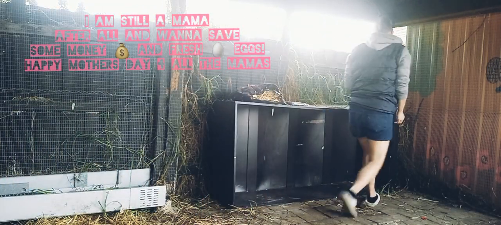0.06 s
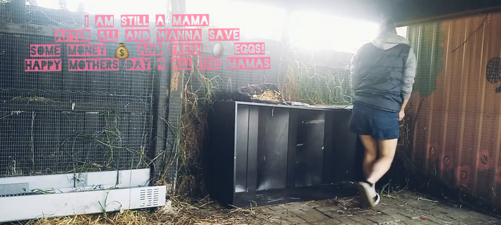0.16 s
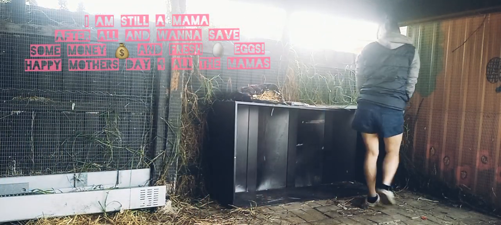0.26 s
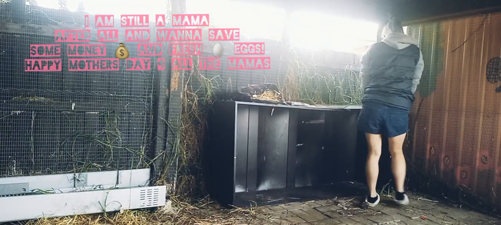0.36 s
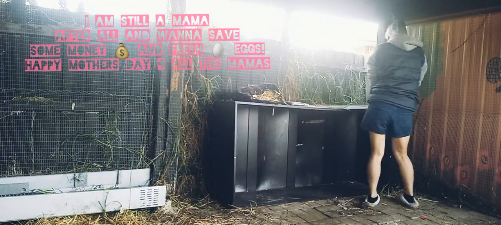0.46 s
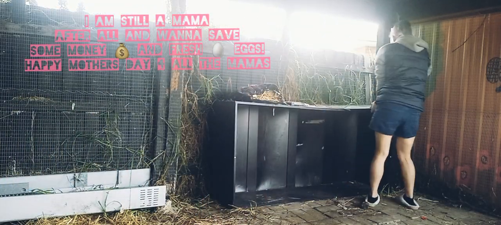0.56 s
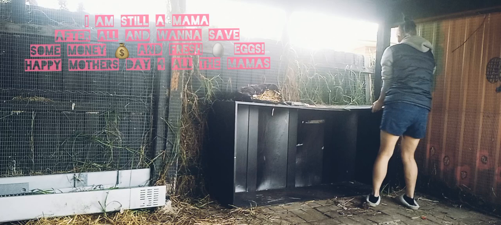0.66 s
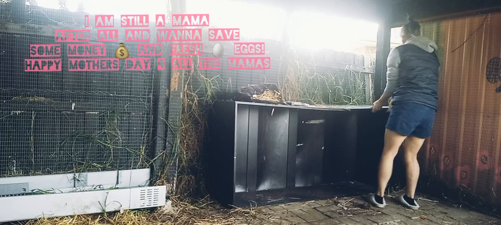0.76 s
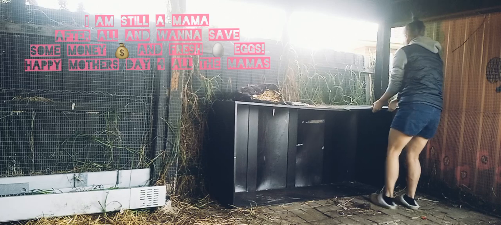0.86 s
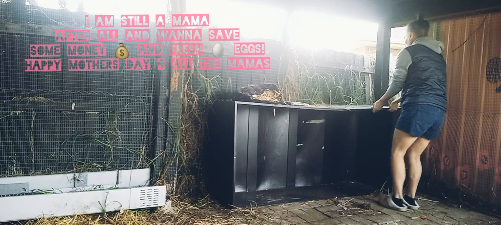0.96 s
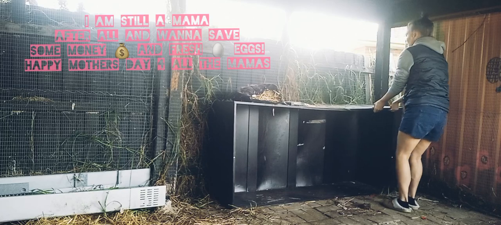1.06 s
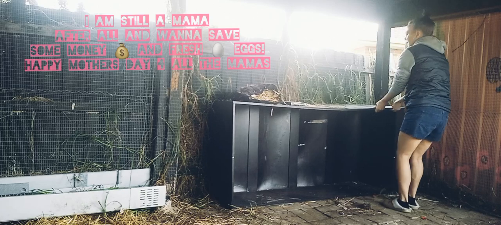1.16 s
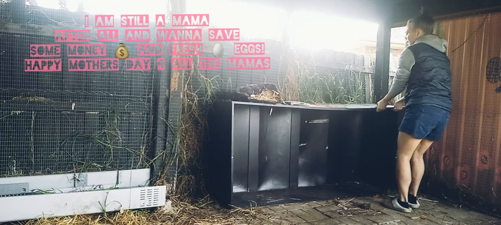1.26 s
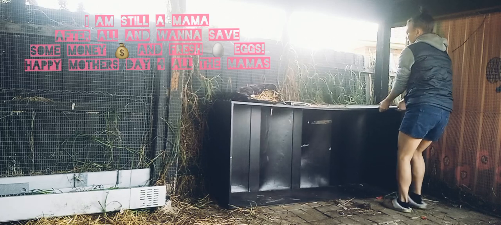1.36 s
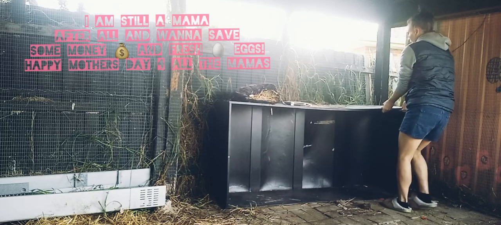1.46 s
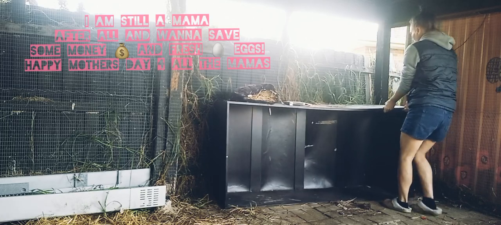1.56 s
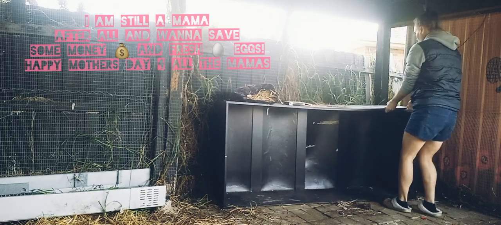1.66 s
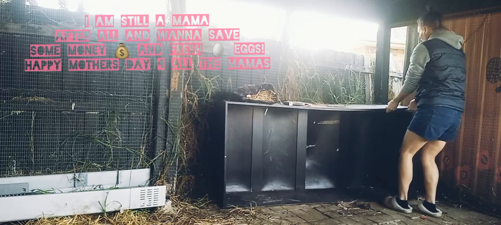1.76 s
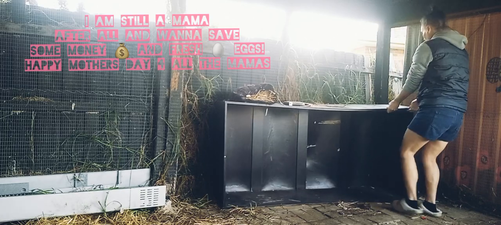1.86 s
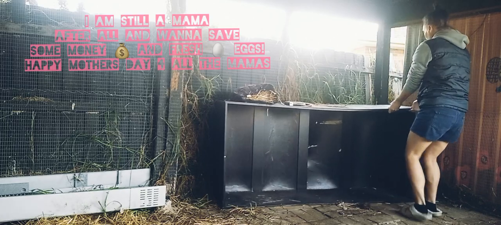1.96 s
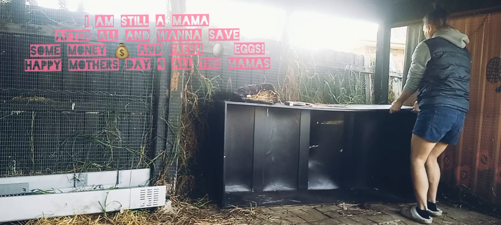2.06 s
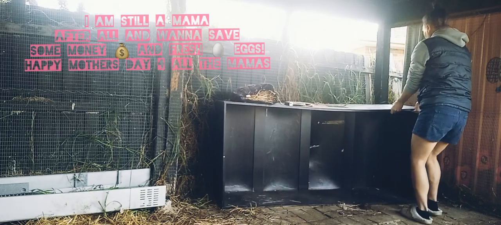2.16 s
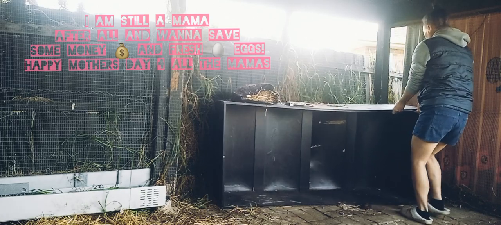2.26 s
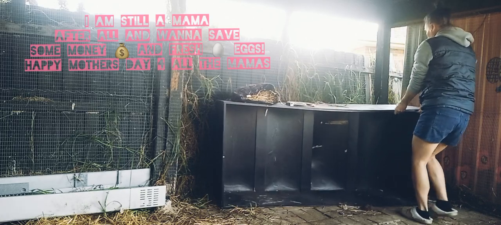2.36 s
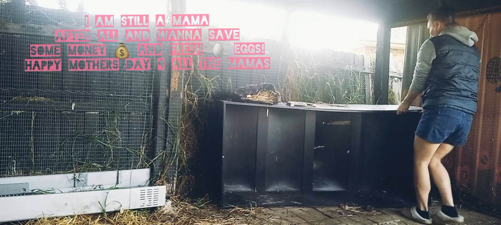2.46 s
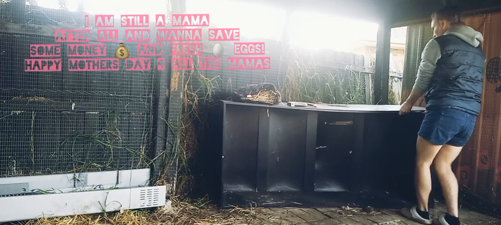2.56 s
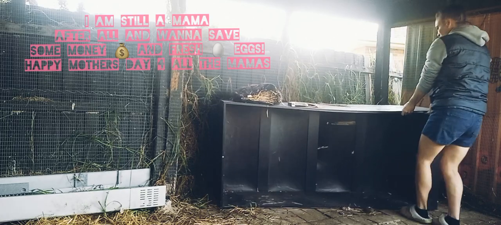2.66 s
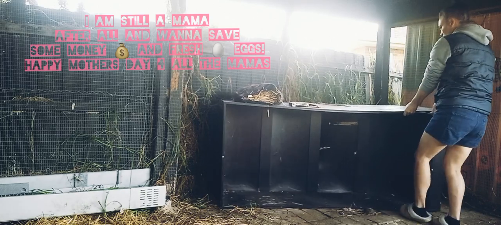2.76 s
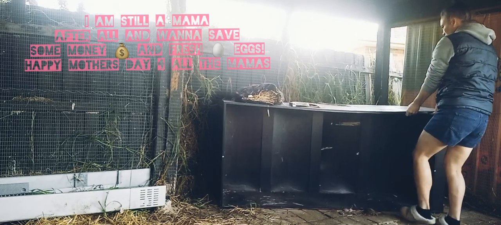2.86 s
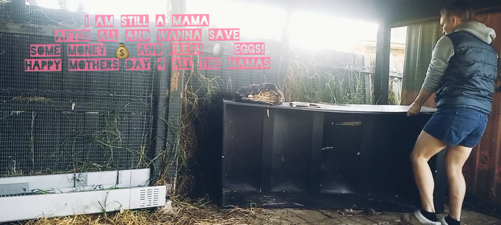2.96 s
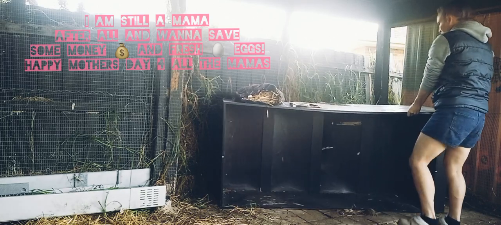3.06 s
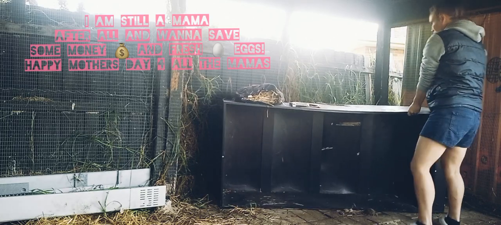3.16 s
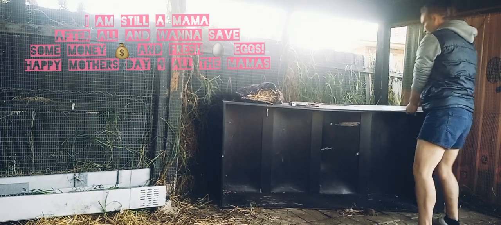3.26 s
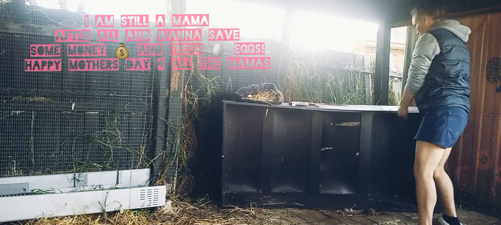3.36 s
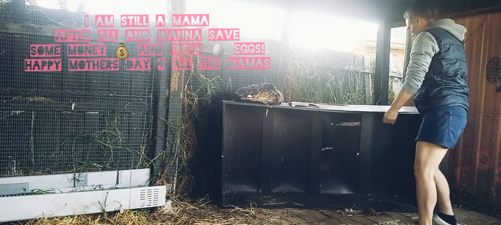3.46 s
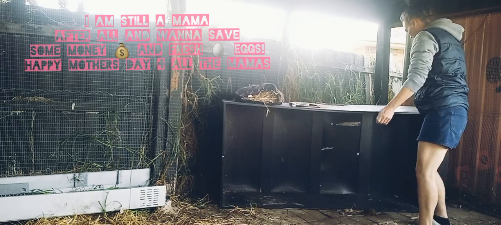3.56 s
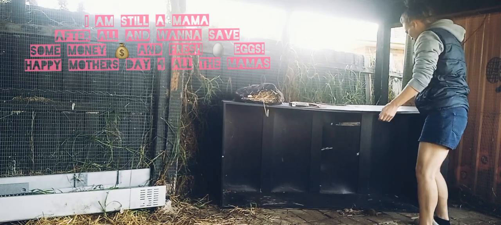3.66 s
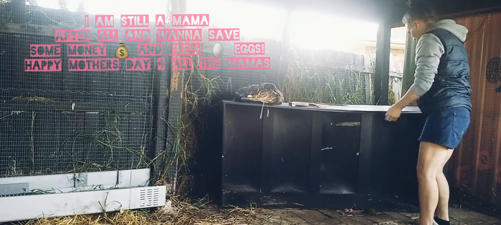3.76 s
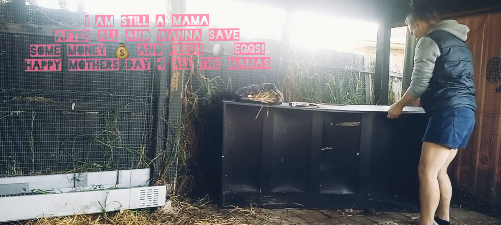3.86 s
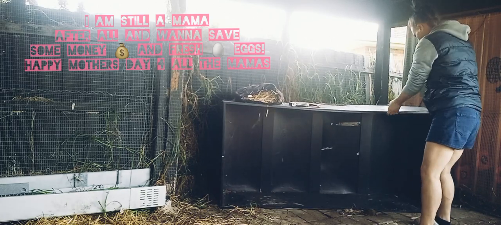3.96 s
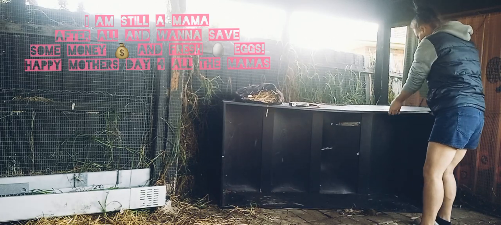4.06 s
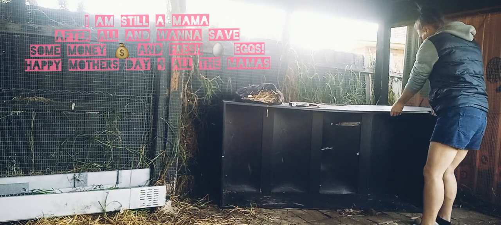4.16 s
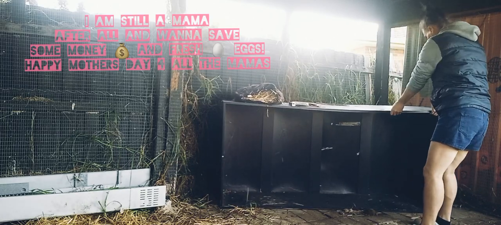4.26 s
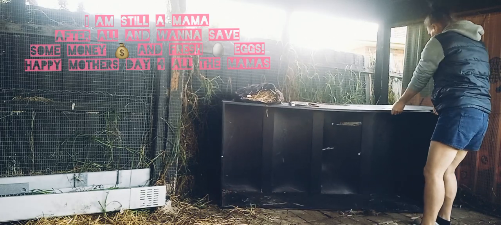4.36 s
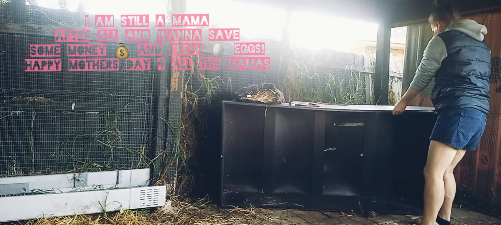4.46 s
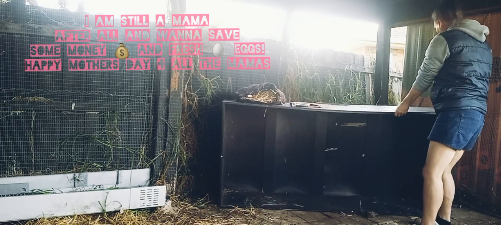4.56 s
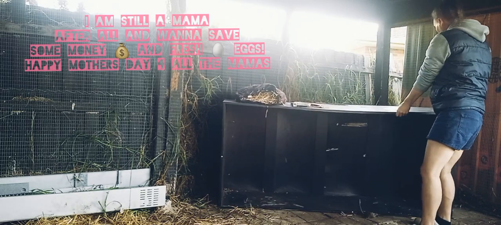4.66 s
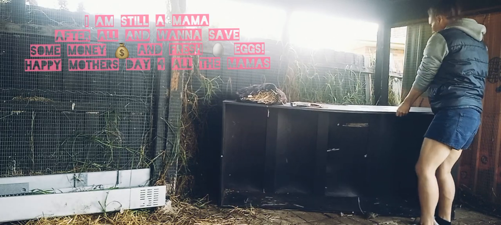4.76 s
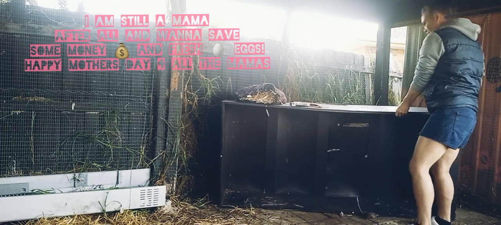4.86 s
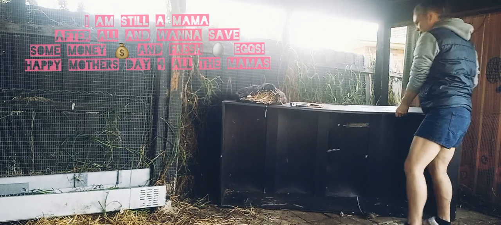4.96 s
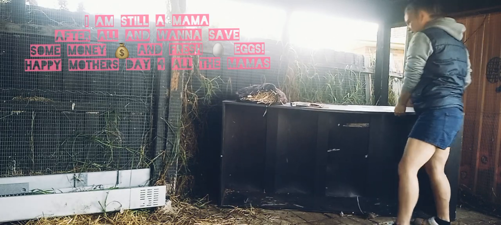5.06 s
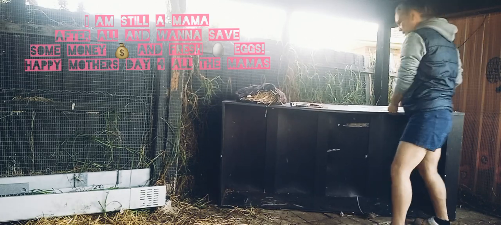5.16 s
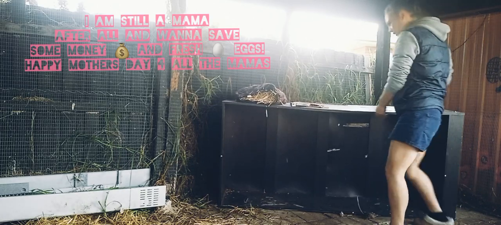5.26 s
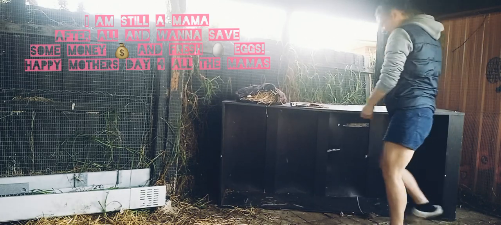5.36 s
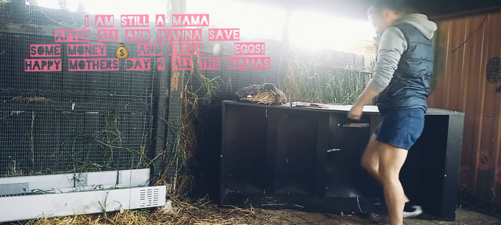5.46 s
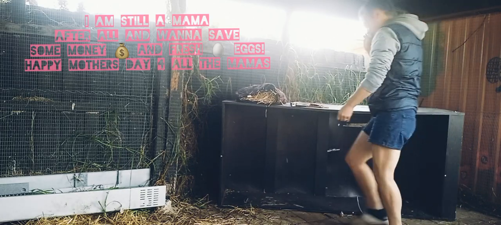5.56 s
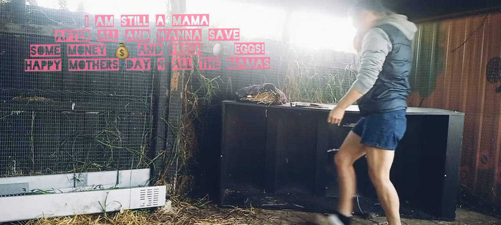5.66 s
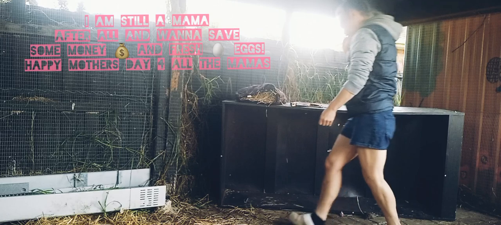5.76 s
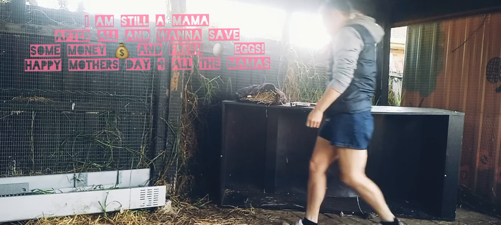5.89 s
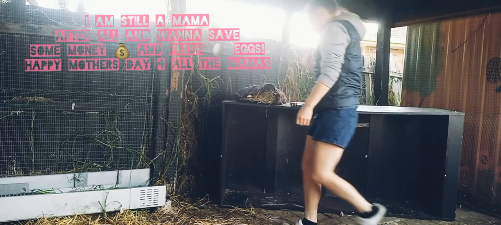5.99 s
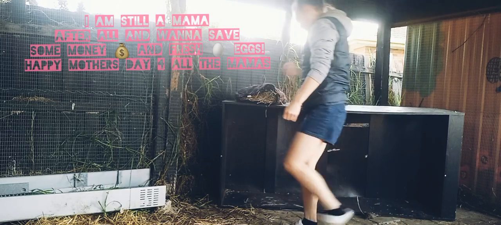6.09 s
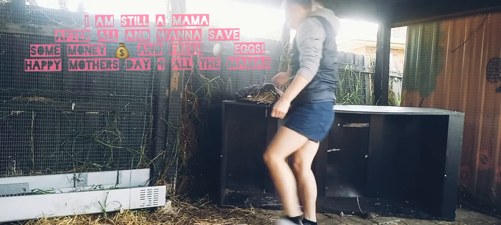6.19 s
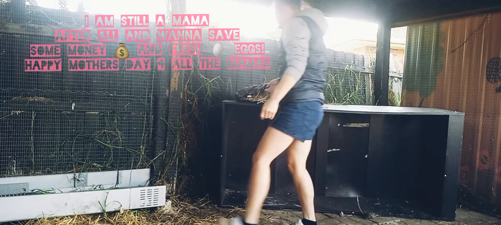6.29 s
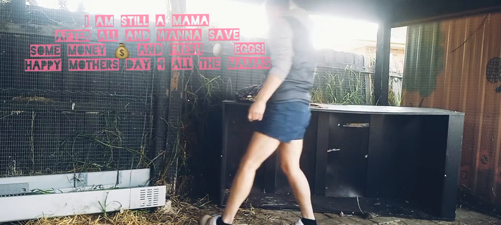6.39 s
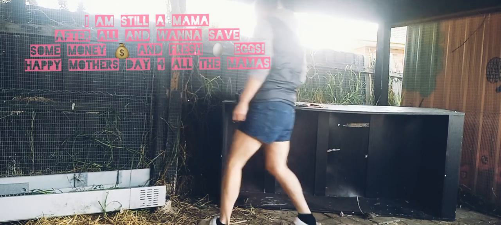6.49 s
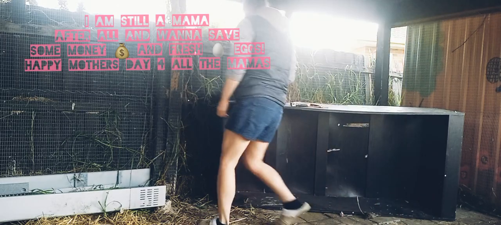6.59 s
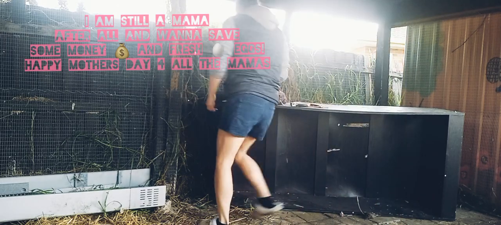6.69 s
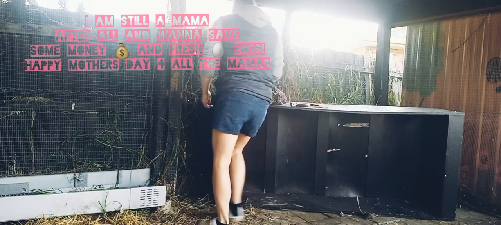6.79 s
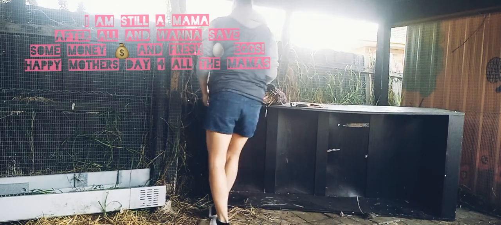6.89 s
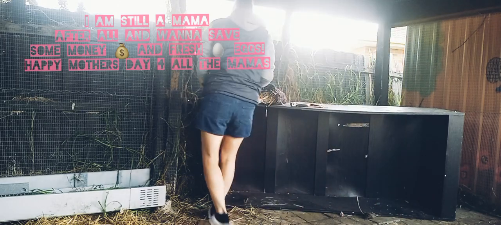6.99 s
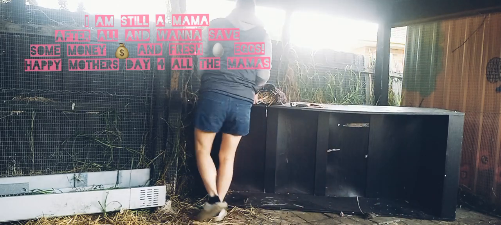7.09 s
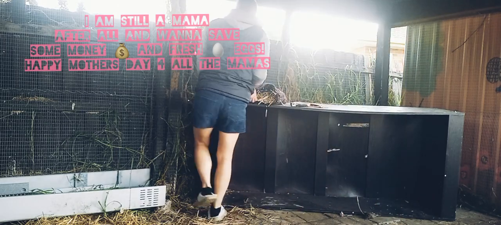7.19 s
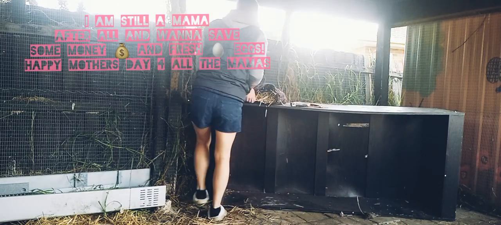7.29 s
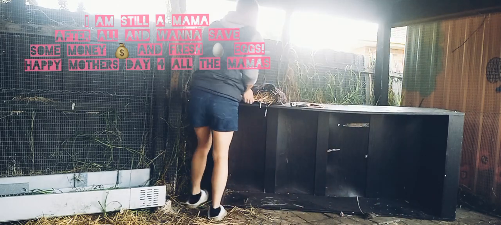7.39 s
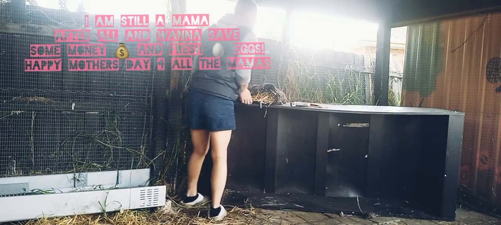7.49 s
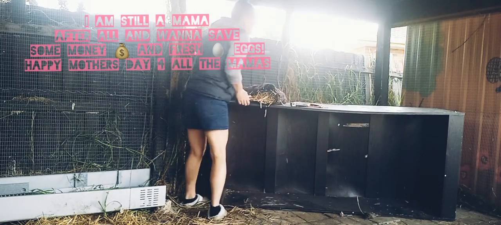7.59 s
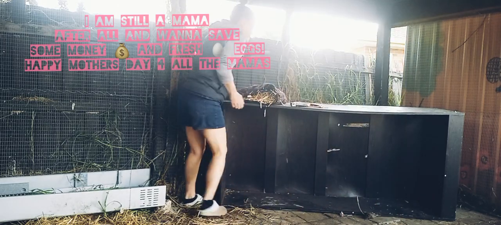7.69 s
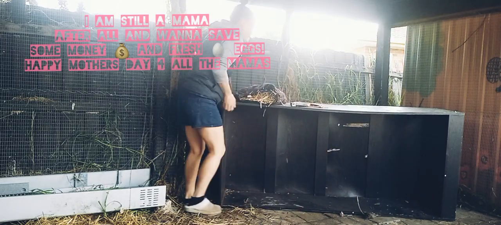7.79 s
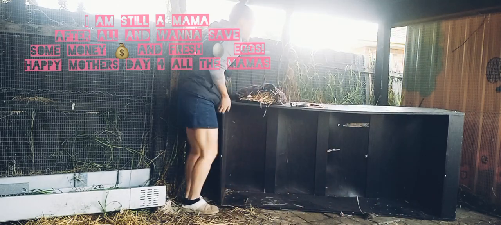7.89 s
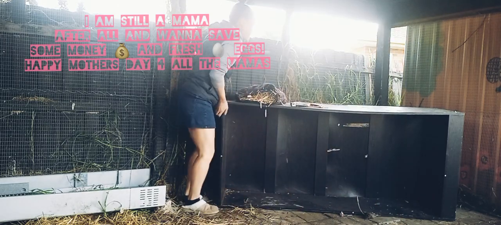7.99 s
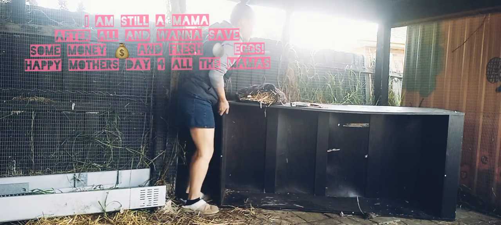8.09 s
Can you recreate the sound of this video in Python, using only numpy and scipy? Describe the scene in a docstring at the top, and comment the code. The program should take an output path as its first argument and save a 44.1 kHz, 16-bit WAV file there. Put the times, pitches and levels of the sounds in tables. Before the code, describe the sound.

A sheltered backyard, quiet air with low distant traffic rumble and faint bird twitter. From 0 to 0.9 s shoes scuff softly on grit and straw, with thin nasal bird calls at 0.3 and 0.6 s. At about 1.1 s a heavy hollow cabinet catches with woody knocks, then judders loudly from 1.3 to 1.8 s, booming and grinding over sandy paving. Gritty crunches follow near 1.9 s; a weaker drag runs 2.3-2.8 s, then deep thumps at 2.95 and 3.2 s. A shoe scrapes at 3.4 s. Bird whistles sound at 4 s, a vehicle hums faintly past, and a last pull from 4.3 s ends in heavy knocks around 4.5-4.6 s and small settling noises by 5 s. A bird chirps at 5.5 s. From 5.7 to 8 s footsteps scuff, rasp and crunch through straw, with far whistles near 7.1 and 8 s. Short, close reverberation.

```python
"""A heavy chipboard cabinet is walked and dragged over gritty paving under a lean-to roof in a backyard.
Stick-slip and impact excite its damped modes (carcass, panels, edges); grains and snaps make the grinding.
Shoes scuff through grit and dry straw as shaped grain noise, and trapped stones rasp as rough gliding tones.
Birds whistle, chirp and call as swept sines; a rumble, hum and twitter of filtered noise lie far behind.
"""
import sys
import numpy as np
from scipy import signal
from scipy.fft import rfft, irfft, next_fast_len
from scipy.io import wavfile
from scipy.ndimage import uniform_filter1d

SR = 44100
rng = np.random.default_rng(int(sys.argv[2]) if len(sys.argv) > 2 else 0)


def wav_out(sig):
    """Save sig, one row per channel (or a flat mono array), as 16-bit PCM at SR to the path in sys.argv[1]."""
    wavfile.write(sys.argv[1], SR, np.round(np.clip(np.atleast_2d(sig).T, -1, 1) * 32767).astype(np.int16))


N = 358577
TIME = np.arange(N) / SR


def from_db(db):
    """Level definition: an amplitude gain is 10 to the power dB/20."""
    return 10 ** (np.asarray(db) / 20)


def rms_one(x):
    """Normalization: scale to a root-mean-square of one."""
    return x / np.sqrt(np.mean(x ** 2) + 1e-20)


def at_hz(points, hz):
    """Interpolation on a logarithmic frequency axis, as the ear spaces pitch."""
    table_hz, value = np.array(points).T
    return np.interp(np.log(hz + 1), np.log(table_hz), value)


def colour(x, spectrum):
    """Linear filtering: weight the spectrum, keeping the power of white noise."""
    size = 2 ** 19
    gain = rms_one(from_db(at_hz(spectrum, np.fft.rfftfreq(size, 1 / SR))))
    return irfft(rfft(x, size) * gain)[..., :N]


def wander(rate, size=N):
    """Low-pass fluctuation: noise averaged twice over 1/rate seconds, scaled to an rms of one."""
    window = int(SR / rate)
    return rms_one(uniform_filter1d(uniform_filter1d(rng.standard_normal(size), window), window))


def steady(x, window_s):
    """Level equalization: divide by the running rms, so only the fine grain remains."""
    power = uniform_filter1d(x ** 2, int(window_s * SR)).clip(0)
    return x / np.sqrt(power + 1e-12)


def grains(per_s, spread_db):
    """Shot noise: clicks at random instants, with random sign and exponentially spread level."""
    present = rng.random(N) < per_s / SR
    size = from_db(spread_db * np.minimum(rng.exponential(1, N), 5))
    return present * size * rng.choice([-1, 1], N)


def crumbling(per_s, spread_db, snaps_db, window_s):
    """Granular fracture: dense fine grains, with now and then the snap of a bigger one."""
    fine = steady(grains(per_s, spread_db), window_s)
    return fine + from_db(snaps_db) * rms_one(grains(45, 1.5))


def bursts(times, levels_db, fade_s):
    """Exponential decay: envelopes that jump up and die away."""
    jumps = np.zeros(N)
    jumps[(times * SR).astype(int)] = from_db(levels_db)
    return signal.lfilter([1], [1, -np.exp(-1 / (fade_s * SR))], jumps + 1e-18)


def strokes(rows, curve, powers):
    """Level as a power of speed: rise, hold, slow to a tenth per fall time; one gain per level column."""
    energy = 0
    for start, rise, hold, fall, *levels_db in rows:
        t = TIME - start
        speed = np.clip(t / rise, 0, 1) ** curve
        speed = speed * 10 ** -np.clip((t - rise - hold) / fall, 0, 10)
        gains = [from_db(db) * speed ** power for db, power in zip(levels_db, powers)]
        energy = energy + np.array(gains) ** 2
    return np.sqrt(energy)


def ring(clicks, hz, t60):
    """Damped resonance: a unit click sets a decaying sine of height one ringing."""
    r, w = from_db(-60 / (t60 * SR)), 2 * np.pi * hz / SR
    return signal.lfilter([0, np.sin(w)], [1, -2 * r * np.cos(w), r * r], clicks + 1e-18)


PORT_SPACING_M = 0.21


def diffuse(size):
    """Diffuse-field coherence: noise at two ports is alike in the bass, unrelated in the treble."""
    mid, side = rfft(rng.standard_normal((2, size)))
    alike = np.sinc(2 * np.fft.rfftfreq(size, 1 / SR) * PORT_SPACING_M / 343)   # sound speed 343 m/s
    ports = np.sqrt(1 + alike) * mid + np.sqrt(1 - alike) * side * [[1], [-1]]
    return irfft(ports, size) / np.sqrt(2)


def from_right(x):
    """Interaural-type delay: the sound reaches the left port 6 samples later."""
    return np.array([np.roll(x, 6), x])


def echo_norm(wet_db, early_db):
    """Energy addition: the total gain of direct sound, early echoes and tail."""
    return np.sqrt(1 + from_db(wet_db) ** 2 + from_db(early_db) ** 2)


# Reverberation of the yard: f/Hz, t60/s
RING_TIMES = [(100, 0.4), (500, 0.28), (2000, 0.2), (6000, 0.22), (15000, 0.19)]


def in_yard(x, wet_db, early_db, early_s):
    """Reverberation: direct sound, dense early echoes off roof and fence, then a soft tail."""
    t = np.arange(SR) / SR
    hz, when, cells = signal.stft(diffuse(size=SR), SR)
    decay = from_db(-60 * when / at_hz(RING_TIMES, hz)[:, None])
    tail = signal.istft(cells * decay)[1][:, :SR] * (t > .008)
    early = diffuse(size=SR) * np.exp(-t / early_s) * (t > .002)
    echoes = (from_db(wet_db) * rms_one(tail) + from_db(early_db) * rms_one(early)) / np.sqrt(SR)
    reverberant = signal.fftconvolve(x[None], echoes, axes=1)[:, :N]
    return (from_right(x) + reverberant) / echo_norm(wet_db, early_db)


def smear(x, seconds):
    """Energy balance: the energy of x dies away with this time constant."""
    r = np.exp(-1 / (seconds * SR))
    return signal.lfilter([1 - r], [1, -r], x ** 2 + 1e-18)


def scattered(x, wet_db, early_db, early_s, t60):
    """Incoherent scattering: echoes of grains all over the ground blur into noise following their energy."""
    early = from_db(early_db) ** 2 * smear(x, early_s)
    tail = from_db(wet_db) ** 2 * smear(x, t60 / np.log(1e6))
    echoes = np.sqrt(early + tail) * diffuse(size=next_fast_len(N, True))[:, :N]
    return (from_right(x) + echoes) / echo_norm(wet_db, early_db)


def air(spectrum):
    """Diffuse field: noise from all sides, of one colour."""
    return colour(diffuse(size=next_fast_len(N, True)), spectrum)


# Spectrum of the still air: f/Hz, level/dB
YARD_SPECTRUM = [(25, -48), (40, -37), (50, -38), (63, 1), (97, -2), (200, -26), (310, -23), (480, -21),
                 (1000, -35), (1700, -24), (2500, -22), (3100, -26.5), (4700, -27.5), (7500, -25.5),
                 (16000, -36)]
# Distant vehicle humming past: start t/s, rise t/s, hold t/s, fall t/s, rumble level/dB, hum level/dB
VEHICLE = [(4.3, 0.89, 0.34, 0.7, -67, -69.5)]
YARD_DB, TRAFFIC_RUMBLE_DB, TRAFFIC_HUM_DB = -74, -73.5, -82


def background():
    """Energy addition of noise bands: still air, traffic with a low hum, a restless twitter of far birds."""
    passing = strokes(VEHICLE, curve=0.56, powers=(1, 1))
    rumble, hum = np.hypot(passing, from_db([[TRAFFIC_RUMBLE_DB], [TRAFFIC_HUM_DB]]))
    # noise spectra: f/Hz, level/dB
    rumble_air = air([(50, -6.5), (130, 0.5), (300, -7.5), (800, -7.0), (1600, -17.5), (4000, -56)])
    hum_air = air([(170, -39), (200, 1.0), (216, 10.5), (232, 2.5), (270, -61.5)])
    twitter = air([(3000, -44), (3650, -3.5), (3850, -5), (4100, -16.5), (4800, -53)])
    traffic = rumble * rumble_air + hum * hum_air
    return from_db(YARD_DB) * air(YARD_SPECTRUM) + traffic + from_db(-82.5 + 2 * wander(rate=63)) * twitter


# Near bird's chirp, which holds, drops and holds again: t/s, f/Hz, level/dB
CHIRP_TRACK = [(5.468, 3440, -80), (5.48, 3570, -45), (5.497, 3460, -48), (5.51, 2793, -46.5),
               (5.545, 2780, -58), (5.57, 2770, -68)]


def near_chirp():
    """Harmonic synthesis: a gliding, jittered tone with two overtones and an echo off the fence."""
    s, hz, db = np.transpose(CHIRP_TRACK)
    pitch = np.interp(TIME, s, hz) * (1 + 0.008 * wander(rate=560))
    phase = 2 * np.pi * np.cumsum(pitch) / SR
    voice = np.sin(phase) + from_db(-12) * np.sin(2 * phase) + from_db(-29) * np.sin(3 * phase)
    chirp = from_db(np.interp(TIME, s, db, left=-200, right=-200)) * voice
    return chirp + from_db(-12.5) * np.roll(chirp, int(.085 * SR))


# Far birds' whistles: start t/s, length t/s, f/Hz about which the pitch moves, level/dB
WHISTLE_CALLS = [(3.997, 0.17, 5140, -72), (4.01, 0.093, 2570, -68), (6.18, 0.11, 2460, -77),
                 (7.09, 0.19, 1470, -64), (7.12, 0.12, 2550, -65), (7.21, 0.073, 3910, -83),
                 (7.96, 0.14, 2580, -66.5)]
# Far bird's nasal calls: start t/s, length t/s, fundamental f/Hz about which it moves, level/dB
NASAL_CALLS = [(.335, 0.078, 1035, -69.5), (.58, 0.13, 1010, -71.5), (5.27, 0.12, 1044, -80)]
# Partials of the nasal calls: multiple of the fundamental, level/dB
NASAL_PARTIALS = [(2, -10), (3, 3.5), (4, 12), (5, -1), (7, 0.5)]


def far_calls():
    """Frequency modulation: each call swells and its pitch arches with the effort."""
    far, waver = np.zeros(N), 1 + 0.031 * wander(rate=350)
    for calls, partials in (WHISTLE_CALLS, [(1, 0)]), (NASAL_CALLS, NASAL_PARTIALS):
        for s, length, hz, db in calls:
            inside = (TIME >= s) & (TIME < s + length)
            effort = np.sin(np.pi * (TIME[inside] - s) / length)
            pitch = hz * (waver[inside] + 0.0413 * (effort - np.pi / 4))
            phase = 2 * np.pi * np.cumsum(pitch) / SR
            voice = sum(from_db(db + k_db) * np.sin(round(k) * phase) for k, k_db in partials)
            far[inside] += effort * voice
    return far


def birds():
    """Superposition: near chirp, thin whistles and nasal calls share the reverberant yard."""
    return in_yard(near_chirp() + far_calls(), wet_db=5, early_db=2, early_s=.02)


# Stone caught under a foot or sole: start t/s, length t/s, first f/Hz, last f/Hz, level/dB
STONES = [(1.498, 0.0292, 1664, 1920, -33.5), (2.842, 0.026, 4730, 4600, -51),
          (3.182, 0.052, 2700, 783, -42.5), (3.529, 0.069, 2300, 3040, -40.5),
          (4.456, 0.049, 3870, 3030, -40.5), (5.047, 0.12, 1300, 1704, -49.5),
          (5.21, 0.023, 2133, 1990, -50.5), (6.437, 0.1, 812, 699, -44.5), (6.938, 0.077, 854, 703, -46),
          (7.656, 0.071, 2890, 3150, -47.5)]


def rasps():
    """Amplitude modulation: a trapped stone's rough noise multiplies a tone that follows its speed."""
    out = np.zeros(N)
    for s, length, from_hz, to_hz, db in STONES:
        along = np.linspace(0, 1, int(length * SR))
        lowpass = signal.butter(2, 0.26 * from_hz, fs=SR, output="sos")
        rough = rms_one(signal.sosfilt(lowpass, rng.standard_normal(len(along))))
        tone = np.sin(2 * np.pi * np.cumsum(from_hz + (to_hz - from_hz) * along) / SR)
        out[int(s * SR):][:len(along)] += from_db(db) * np.sin(np.pi * along) * rough * tone
    return in_yard(out, wet_db=0.5, early_db=9.5, early_s=0.0043)


# Slides of a shoe on the paving:
# start t/s, rise t/s, hold t/s, fall t/s, sole level/dB, straw and grit level/dB
SLIDES = [(.062, 0.026, 0.019, 0.11, -62, -60.5), (.459, 0.0059, 0.016, 0.095, -51, -57.5),
          (.52, 0.005, 0.0063, 0.18, -53.5, -63), (.68, .06, 0.051, .1, -65, -64.5),
          (.77, 0.092, 0.02, .1, -48, -52.5), (3.39, .11, 0.079, 0.047, -45.5, -50.5),
          (3.74, 0.047, .01, 0.13, -75.5, -66.5), (5.733, 0.0095, 0.098, 0.21, -56.5, -66),
          (5.972, .025, 0.0094, 0.053, -60, -59), (6.36, 0.019, .12, .18, -52, -53),
          (6.753, 0.012, .035, 0.42, -64.5, -56.5), (6.81, 0.13, 0.03, 0.075, -51, -52),
          (7.04, 0.065, .01, 0.13, -60, -55.5), (7.4, 0.066, 0.082, 0.2, -67, -63),
          (7.638, 0.022, 0.041, .14, -57.5, -57.5), (7.79, 0.066, 0.074, 0.092, -49, -54.5),
          (8.04, 0.053, .04, .1, -76, -71)]
# Exponents of loudness against sliding speed: sole, straw
SLIDE_POWERS = (1.115, 1)
# Grit cracking under a shoe or a cabinet foot: t/s, crunch level/dB, slap level/dB
GRIT_STEPS = [(0.0725, -63, -79), (0.465, -49, -62), (0.5302, -56, -59), (1.4267, -56, -45),
              (1.88, -44.5, -50.5), (1.969, -42, -34.5), (2.51, -45.5, -39), (4.906, -60, -72),
              (5.032, -48, -60), (5.3246, -63, -71), (5.8802, -82, -45.5), (6.4589, -67.5, -37.5),
              (6.479, -41.5, -71), (6.77, -46.5, -63), (6.79, -46.5, -60), (6.951, -82, -42.5),
              (6.9672, -46, -36.5), (7.8042, -54, -50), (7.923, -51, -65)]
# Spectrum of the rubbing soles: f/Hz, level/dB
SOLE_SPECTRUM = [(60, -13), (130, -9), (300, -8.5), (520, -7), (750, -4), (1000, -1), (1500, 0),
                 (2300, -2.5), (3500, -6.5), (5000, -15), (8000, -49)]
# Spectrum of the crushed straw: f/Hz, level/dB
STRAW_SPECTRUM = [(1500, -36.5), (3000, -2), (4300, 1.5), (6300, 0.5), (7600, 3), (9500, -1), (12500, 3),
                  (16000, -2.5)]
SCUFF_CURVE = 1.17   # how the speed builds during the rise (1 = evenly)
TICK_DB, TICK_S = 5, 0.00082   # first hard touch of a sole: level above its slap, decay time


def shoes():
    """Friction and fracture: soles rub on stone and crush straw; each landing adds a burst of grains."""
    rub, crush = strokes(SLIDES, SCUFF_CURVE, SLIDE_POWERS)
    s, crunch_db, slap_db = np.transpose(GRIT_STEPS)
    grip = from_db(0.57 * wander(rate=190))
    rubbing = rub * grip + bursts(s, slap_db, fade_s=0.0085)
    sole = rubbing * steady(grains(per_s=1800, spread_db=3.5), window_s=0.019)
    sole = sole + bursts(s, slap_db + TICK_DB, fade_s=TICK_S) * rng.standard_normal(N)
    crushing = crush * grip + bursts(s, crunch_db, fade_s=0.015)
    straw = crushing * crumbling(per_s=2200, spread_db=-1.5, snaps_db=-7.5, window_s=0.023)
    # the gap under the cabinet colours the scuffs
    hollow = in_yard(sole, wet_db=3.5, early_db=9.0, early_s=0.0023)
    open_sole = scattered(sole, wet_db=-1, early_db=-3.0, early_s=0.0047, t60=0.17)
    straw = scattered(straw, wet_db=-4.0, early_db=17.0, early_s=0.0022, t60=0.85)
    return (colour(from_db(-2.5) * open_sole + from_db(-3.0) * hollow, SOLE_SPECTRUM)
            + colour(straw, STRAW_SPECTRUM))


# Modes of the cabinet: f/Hz, level/dB, t60/s when ringing freely
CABINET_MODES = [(62, -11, .18), (80, -8.5, 0.156), (111.2, 3.5, 0.19), (127, 3, .12), (154.5, -4.5, .13),
                 (179, -10, .12), (219.7, -4.5, .15), (252.4, -3, 0.16), (286.2, 2.5, .15), (322.2, 1, .13),
                 (380, -3.5, .1), (423, 0, 0.1), (490, -4, .13), (534, -6.5, 0.087), (591, -7, .07),
                 (640, 1.5, 0.067), (714, -1, .1), (802, -5, 0.12), (880, -2.5, 0.12), (957, -2, 0.085),
                 (1080, -5, 0.084), (1184, -4, 0.05), (1354, -8, 0.08), (1554, -6.5, 0.064),
                 (1847, -5, 0.052), (2290, -15, 0.075)]
# Mode bands of carcass, panels and edges, in that order: lowest f/Hz, upper limit f/Hz
MODE_BANDS = [(0, 200), (200, 600), (600, 3000)]
CARCASS, PANELS, EDGES = MODE_BANDS


def modes_of(part):
    """Modal decomposition: select the cabinet modes that belong to one part."""
    return [mode for mode in CABINET_MODES if part[0] <= mode[0] < part[1]]


def judder(part, slips_per_s, spread_db, damping):
    """Stick-slip friction: each slip shakes every mode anew, and the rubbing shortens the ring."""
    slips = grains(slips_per_s, spread_db)
    shaken = sum(ring(slips * rng.normal(0, from_db(db), N), hz, t60 / damping)
                 for hz, db, t60 in modes_of(part))
    return steady(shaken, window_s=0.047)


# Cabinet feet catching and landing: t/s, carcass level/dB, panels level/dB, edges level/dB
LANDINGS = [(1.086, -61, -32, -55), (1.148, -48.5, -24, -33), (1.163, -40, -26, -37),
            (1.357, -32, -16.5, -52), (1.384, -27, -26, -48), (1.476, -24, -26.5, -38),
            (1.495, -31, -47, -33), (1.772, -38, -33.5, -42), (2.949, -22, -37, -40),
            (2.967, -20.5, -22.5, -38), (3.034, -25.5, -33.5, -46), (3.233, -20.5, -31, -42),
            (4.275, -54, -60, -72), (4.345, -60, -46, -69.5), (4.517, -23, -25.5, -37.5),
            (4.528, -16.5, -24.5, -40.5), (4.576, -18, -18, -25.5), (4.729, -37, -36.5, -52),
            (4.968, -34.5, -35.5, -55), (5.015, -40.5, -54, -69)]


def knocks(part, levels_db, scatter):
    """Impact excitation: a landing foot rings one part; paired modes alternate in sign."""
    at, out = (np.array(LANDINGS)[:, 0] * SR).astype(int), 0
    for k, (hz, db, t60) in enumerate(modes_of(part)):
        clicks = np.zeros(N)
        clicks[at] = from_db(levels_db + db) * (1 + scatter * rng.standard_normal(len(at)))
        sign = 1 if part == CARCASS else (-1) ** (k // 2)   # the carcass moves as a whole
        out = out + ring(clicks, hz, t60) * sign
    return out / np.sqrt(sum(from_db(db) ** 2 for hz, db, t60 in modes_of(part)))


# Pulls on the cabinet: start t/s, rise t/s, hold t/s, fall t/s,
# carcass level/dB, panels level/dB, grinding level/dB, grit crackle level/dB
CABINET_PULLS = [(0.995, 0.062, .19, 0.26, -50, -46, -50.5, -50.5),
                 (1.28, 0.051, .17, 0.28, -30.5, -29.5, -42, -45.5),
                 (1.86, 0.1, 0.021, .22, -45, -43, -50, -50),
                 (2.15, 0.08, 0.072, 0.094, -60, -57.5, -58.5, -59.5),
                 (2.27, 0.15, 0.35, 0.23, -41, -46, -52.5, -55.5),
                 (2.72, 0.21, 0.0067, 0.16, -32.5, -39.5, -48.5, -56.5),
                 (3.11, 0.095, 0.0072, 0.14, -37.5, -46.5, -52.5, -60),
                 (4.28, 0.22, 0.053, 0.17, -35, -36, -49.5, -54.5),
                 (4.645, 0.054, 0.035, 0.29, -42, -41, -52.5, -54.5),
                 (4.99, 0.062, 0.035, 0.21, -56, -54, -52.5, -61.5)]
# Exponents of loudness against sliding speed: carcass, panels, grinding, grit
PULL_POWERS = (1.2, 1.46, 0.96, 0.61)
# Spectrum of the grinding sand: f/Hz, level/dB
GRIND_SPECTRUM = [(400, -9), (650, -1), (950, 1), (1500, -0.5), (2400, -1), (3600, -6.5), (5000, -14.5),
                  (8000, -25)]
# Spectrum of the crackling grit: f/Hz, level/dB
GRIT_SPECTRUM = [(1500, -31), (3000, 0), (4300, -1), (6300, -5), (7500, -2.5), (9300, -7), (12500, -2.5),
                 (16000, -13)]
PULL_CURVE = 1.25   # how the speed builds during the rise (1 = evenly)
BOOM_CUT_HZ = 93   # below this the carcass hardly radiates


def cabinet():
    """Friction-driven and struck resonance: judder and knocks in the wood, sand grinding under the feet."""
    carcass, panels, grinding, crackle = strokes(CABINET_PULLS, PULL_CURVE, PULL_POWERS)
    s, carcass_db, panels_db, edges_db = np.transpose(LANDINGS)
    sliding = 1 / (1 + 1.5 * bursts(s, 0, fade_s=.04))   # a landing foot briefly checks the slide

    boom = carcass * sliding * judder(CARCASS, slips_per_s=160, spread_db=1.5, damping=1.0)
    boom = boom + knocks(CARCASS, carcass_db, scatter=0.25)
    boom = signal.sosfilt(signal.butter(2, BOOM_CUT_HZ, "high", fs=SR, output="sos"), boom)
    wood = panels * sliding * judder(PANELS, slips_per_s=240, spread_db=2.5, damping=3.0)
    wood = wood + knocks(PANELS, panels_db, scatter=0.061)
    edge_drive = from_db(-12) * grinding + from_db(-20.5) * panels
    edges = edge_drive * judder(EDGES, slips_per_s=220, spread_db=6.0, damping=1.5)
    edges = edges + knocks(EDGES, edges_db, scatter=0.46)

    crack = bursts(s, edges_db - 21.0, fade_s=0.013)
    bite = from_db(2.0 * wander(rate=19.5))   # the feet bite unevenly into the paving
    sand = grinding * bite + crack
    sand = sand * crumbling(per_s=1800, spread_db=1.5, snaps_db=-11.0, window_s=0.016)
    grit = crackle * bite * crumbling(per_s=1100, spread_db=2.0, snaps_db=-7.0, window_s=0.12)
    sand = scattered(sand, wet_db=-1, early_db=18.0, early_s=0.0031, t60=0.38)
    grit = scattered(grit, wet_db=0.5, early_db=13, early_s=0.0048, t60=0.3)

    return (in_yard(boom, wet_db=-11, early_db=-12, early_s=0.0042)
            + in_yard(wood + edges, wet_db=-7.0, early_db=-1.0, early_s=0.0077)
            + colour(sand, GRIND_SPECTRUM) + colour(grit, GRIT_SPECTRUM))


LEFT_DB = 0.94   # level of the left port above the right


def scene():
    """Superposition: the far surroundings, birds, stones, shoes and cabinet add linearly."""
    total = background() + birds() + rasps() + shoes() + cabinet()
    return total * from_db([[LEFT_DB / 2], [-LEFT_DB / 2]])


CUTOFF_HZ = 15900


def record(dry):
    """Band limitation: a small microphone drops the deep bass, and the top is cut."""
    thin = signal.sosfilt(signal.butter(6, 54, "high", fs=SR, output="sos"), dry)
    return signal.sosfilt(signal.ellip(12, .1, 80, CUTOFF_HZ, fs=SR, output="sos"), thin)


dry = scene()
out = record(dry)
wav_out(out)
```